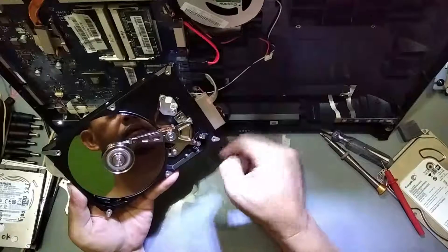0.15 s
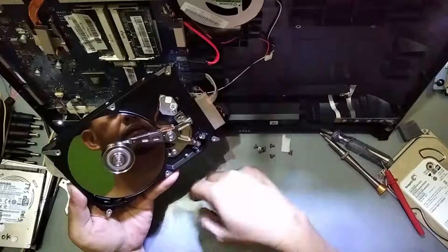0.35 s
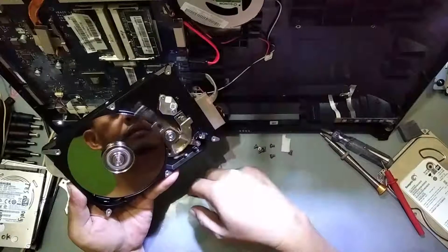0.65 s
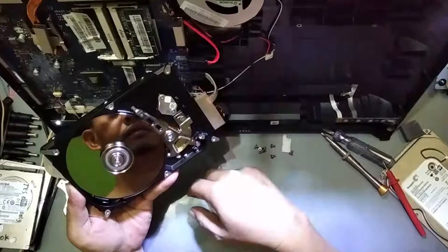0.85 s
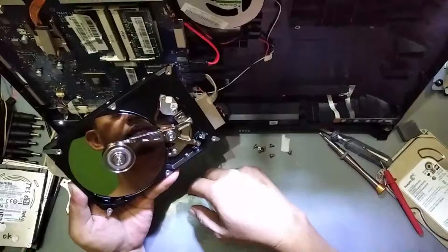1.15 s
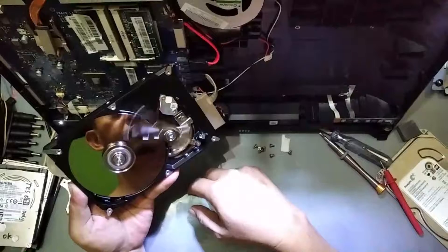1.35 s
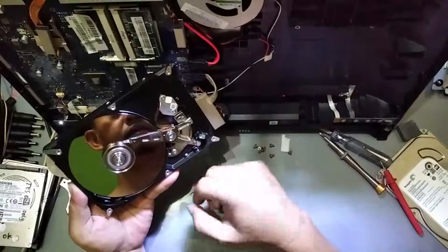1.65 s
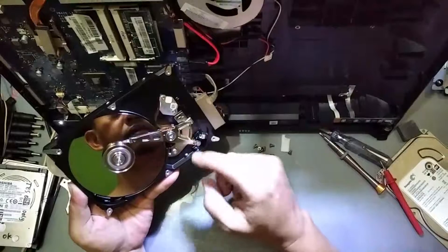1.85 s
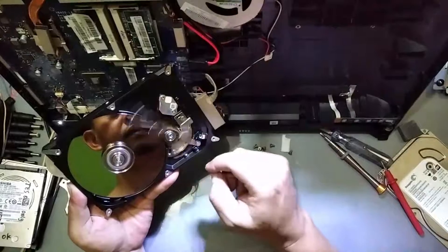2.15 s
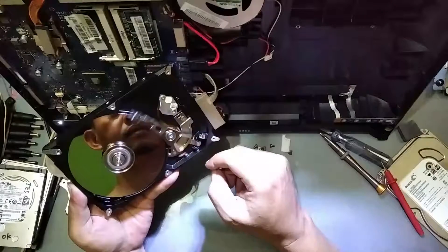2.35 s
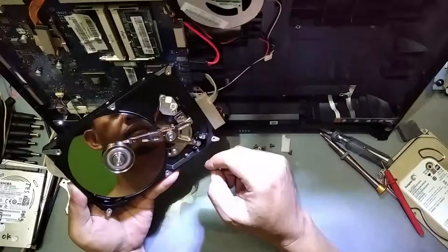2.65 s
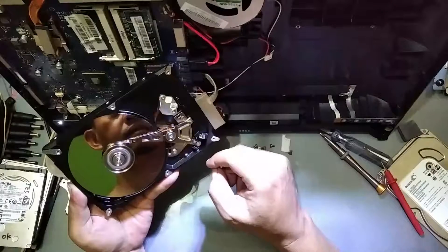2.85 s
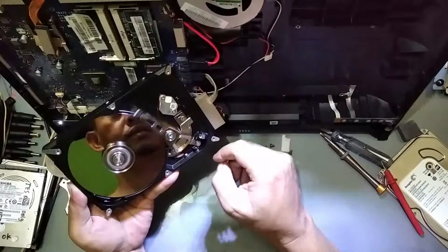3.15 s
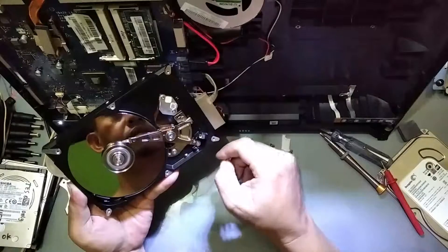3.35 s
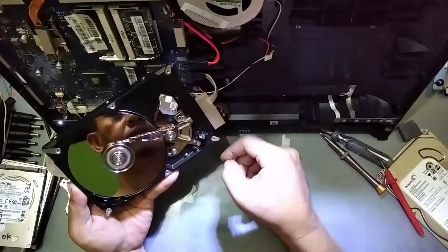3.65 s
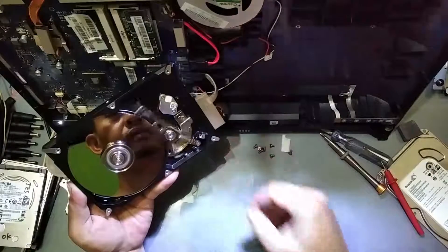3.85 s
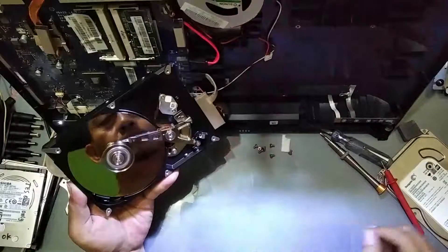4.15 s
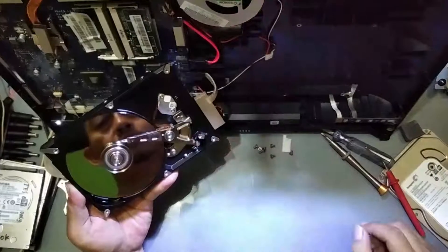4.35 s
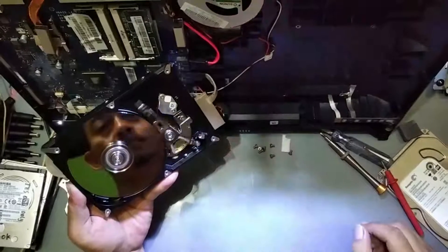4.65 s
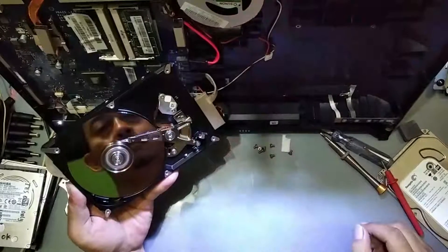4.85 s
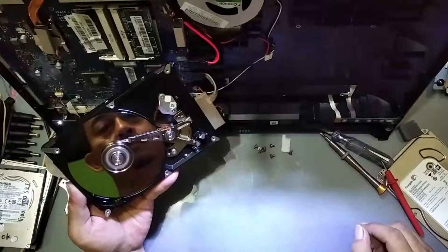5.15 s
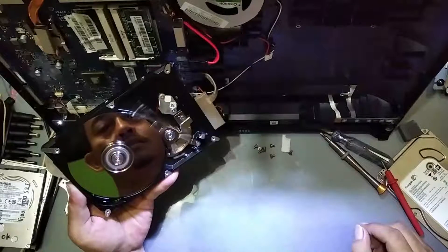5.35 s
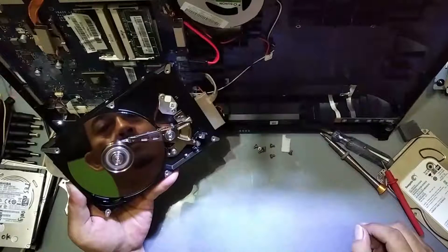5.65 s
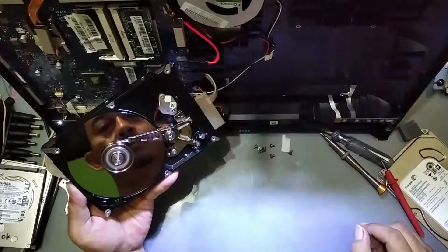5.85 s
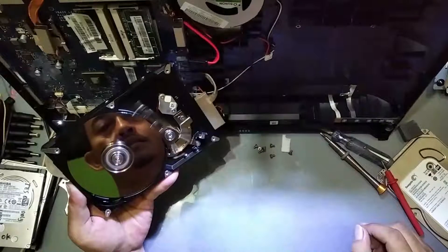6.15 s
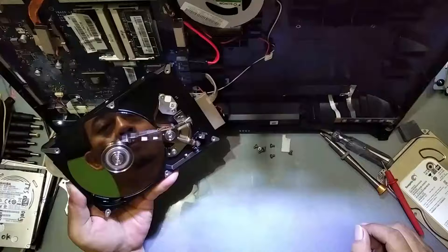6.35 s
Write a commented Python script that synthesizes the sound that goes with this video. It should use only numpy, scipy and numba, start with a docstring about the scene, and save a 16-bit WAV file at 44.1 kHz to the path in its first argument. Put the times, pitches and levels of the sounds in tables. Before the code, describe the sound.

Close to the microphone, an opened hard disk spins with a constant airy whine over faint computer fan noise and hum. About every 0.8 seconds its head arm slams with a sharp, bright metallic clack, usually followed by a rebound, a brief chirp and a lighter landing click with tiny bounces. Each hit rings in a small hard room. A hand softly bumps the desk near the start and again later.

```python
"""Opened hard disk on a desk

A small hard room, the camera's microphone close to an opened hard disk beside a running computer.
About every 0.8 s the head arm slams into its stop, mostly rebounds and chirps, then usually swings back and
bounces: damped arm modes, ringing chassis modes and decaying noise for the walls. Filtered noise gives the
air whine, the fan and two hand bumps; sines give the hum, and gain control ducks the loud slams."""
import sys
import numpy as np
from scipy import signal
from scipy.fft import rfft, irfft, next_fast_len
from scipy.io import wavfile
from scipy.ndimage import uniform_filter1d, minimum_filter1d, map_coordinates
from numba import njit

SR = 44100
rng = np.random.default_rng(int(sys.argv[2]) if len(sys.argv) > 2 else 0)


def transcribe(signal):
    """Save signal, clipped to [-1, 1], as a 16-bit WAV file at the path in sys.argv[1]."""
    frames = np.atleast_2d(signal).T
    limited = np.clip(frames, -1, 1)
    pcm = np.round(limited * 32767).astype(np.int16)
    wavfile.write(sys.argv[1], SR, pcm)


N = 286650  # length in samples

# The arm's retries. Each row: slam in seconds, slam level in dB, rebound level in dB (None if the arm only
# coasts), seconds from slam to landing (None if it does not land), landing level in dB, seconds between
# bounces. All levels are relative: head_arm() adds its own to them.
RETRIES = [(0.0056, 1, 8.5, 0.161, -3, 0.074), (0.765, 2.5, 7, None, None, None),
           (1.547, 3.5, None, 0.129, -2, 0.051), (2.3462, 2, 6.5, 0.1578, 2, 0.048),
           (3.1296, 2.5, 7.5, 0.16, 3.5, 0.053), (3.9113, 0.5, 5.5, 0.1643, -4.5, 0.075),
           (4.6945, 1.5, None, 0.131, -5, 0.066), (5.4932, 2.5, 10, 0.16, 3, 0.042),
           (6.2764, 2, 10.5, 0.1585, 3.5, 0.042)]
# Two light ticks where the arm does not land. Each row: start in seconds, relative level in dB,
# brightness in dB per octave.
LATE_TICKS = [(1.1395, -16, 5), (1.1679, -11, 0)]
# Heavily damped modes of arm and stop. Each row: pitch in Hz, relative level in dB, time to fall 60 dB in
# seconds, left minus right in dB.
ARM_MODES = [(1742.5, -23, 0.045, -12.5), (3060, -24, 0.049, 5), (4133, -12.5, 0.031, -8.5),
             (5366, -3.5, 0.011, -9.5), (5790, -8, 0.017, -14), (6538, -4.5, 0.016, -14.5),
             (6860, -20, 0.027, -5), (7850, -5, 0.0036, -17), (8926, -2, 0.012, 1), (9230, 0, .012, 4.5),
             (10530, -14, 0.0068, -11)]
# Long-ringing modes of platter and chassis. Each row: pitch in Hz, relative level in dB.
CHASSIS_MODES = [(1731, -8.5), (3098, -5), (4074, -6), (4231, -9), (5341, -3), (5410, -3), (5498, -5),
                 (5771, -25), (6452, -16), (6533, -18), (6672, -4), (8884, -11), (8949, -4.5), (9218, -3),
                 (10260, -11)]
# A short low splash at each slam, dead and quick. Each row: pitch in Hz, relative level in dB, time to fall 60
# dB in seconds.
SPLASH_MODES = [(174, -29, 0.018), (963, 2, 0.0049), (2170, 6, 0.0034)]
# Colour of the room's wash. Each row: frequency in Hz, relative density in dB per Hz.
WASH_SPECTRUM = [(1200, -31.5), (1730, -16.5), (2300, -21), (3400, -13.5), (4100, -2), (5000, -4.5),
                 (5400, 4), (6100, 0), (6550, 4.5), (7600, -8.5), (9000, 4), (9800, -8), (11600, -14),
                 (14000, -21)]
# Decay of the room. Each row: frequency in Hz, time to fall 60 dB in seconds.
ROOM_DECAY = [(1500, 0.38), (5000, 0.42), (9000, 0.35), (14000, 0.36)]
# The walls favour one side or the other. Each row: frequency in Hz, left minus right in dB.
WALL_LEAN = [(1700, -2.5), (3100, 2), (4200, 0), (6600, -3.5), (8000, -2), (9200, 7), (11000, 2.5)]
# Hand on the desk. Each row: start in seconds, thud level in dB, brush level in dB.
BUMPS = [(0.481, -37.5, -32), (3.855, -34, -38)]
# Colour of the desk under the hand. Each row: frequency in Hz, relative density in dB per Hz.
DESK_SPECTRUM = [(30, -30), (75, -8), (110, -4), (200, -4), (900, -2), (1300, -24), (4000, -28),
                 (14000, -60)]
# Resonances excited by the platter's air stream. Each row: centre in Hz, width in Hz, relative level in dB.
WINDAGE = [(1716, 167, 0.5), (2926, 340, -6.5), (3525, 317, 2.5), (4720, 800, -8.5), (5800, 770, -12.5),
           (8070, 1250, -5.5), (8970, 280, -2), (10400, 400, -18), (13200, 830, -28)]
# Air noise of the computer. Each row: frequency in Hz, relative density in dB per Hz.
FAN_SPECTRUM = [(25, -31), (60, -14), (110, 0), (170, -0.5), (270, -2.5), (400, -5), (600, -7),
                (1300, -9.5), (2500, -9.5), (5000, -50)]
# Lines of spindle and fan. Each row: pitch in Hz, relative level in dB.
HUM_LINES = [(119.8, -68), (209.5, -64), (261, -66), (313, -60), (365.6, -67.5), (479.2, -68.5)]
# Likeness of left and right in the steady noise. Each row: frequency in Hz, correlation from 0 to 1.
LIKENESS = [(60, 0.26), (150, 0.96), (380, 0.3), (950, 0.48), (2380, 0.43), (5980, 0.13), (15000, 0.067)]
# Stereo lean of the steady sound. Each row: frequency in Hz, left minus right in dB.
STEADY_LEAN = [(100, 13), (350, 14), (500, -0.5), (1200, 0.5), (1700, -2.5), (2400, 0.5), (3600, -1.5),
               (5500, 1.5), (7500, -2.5), (9200, 4.5), (11000, 3.5), (14000, 2.5)]
# Treble colour of the microphone. Each row: frequency in Hz, gain in dB.
MICROPHONE = [(10000, 0), (11600, 2), (12300, -2), (14000, 0.5)]

LEAD = 0.006  # the arm's last approach to the stop (s)
RISE = 0.0003  # time constant with which a contact builds up (s)
REBOUND_S = 0.0354  # from the slam to the second strike on the stop (s)
BOUNCES = 2  # small bounces after a landing
BOUNCE_DB, BOUNCE_LOSS_DB = -15.5, 10.5  # ceiling of a bounce; least loss from contact to contact (dB)
REBOUND_TILT, LANDING_TILT, BOUNCE_TILT = -2.7, -4.06, 0.5  # brightness (dB per octave)
CHIRP_S, CHIRP_DB = 0.146, -38.5  # chirp: delay after a driven slam (s), level (dB)
DESK_HZ, DESK_T60, DESK_DB = 108, 0.2, -0.5  # boom: pitch, decay (s), level against the thud (dB)
TOP_HZ = 14300  # nothing passes above this


def head_arm(slam_db, splash_db, tick_db):
    """The arm hits its stop hard with a short low splash; lighter contacts follow."""
    track = np.zeros((2, N))
    # the same walls and the same basic snap serve every contact
    walls = noise(WASH_SPECTRUM, SR // 2)
    snap = strike(crack_db=-9.5, crack_t60=0.013, spread=0.46)
    for s, db, *_ in RETRIES:
        slam = contact(walls, snap, snap_db=-17, metal_db=-35.5, room_db=-19.5)
        add(track, s - LEAD, swing(scrape_db=-21.0, push_db=-31.5, lead=LEAD))
        add(track, s, amp(db + slam_db) * slam)
        add(track, s, amp(db + splash_db) * splash(lean_db=17))
    for s, db, tilt_db in light_contacts():
        tick = contact(walls, snap, snap_db=-15.0, metal_db=-36, room_db=-19.5)

        def colour(hz):
            tilt = amp(tilt_db * np.log2((hz + 100) / 7000))
            # light contacts lack bass
            bass_cut = (hz ** 2 / (hz ** 2 + 1650 ** 2)) ** 2
            return tilt * bass_cut

        add(track, s, amp(db + tick_db) * filtered(tick, colour))
    return track


def light_contacts():
    """The arm rebounds, lands and bounces ever more weakly: (s, dB, brightness dB per octave)."""
    contacts = list(LATE_TICKS)
    for s, _, rebound_db, swing_s, db, flight_s in RETRIES:
        if rebound_db is not None:
            contacts.append((s + REBOUND_S, rebound_db, REBOUND_TILT))
        if swing_s is None:
            continue
        landing = s + swing_s
        contacts.append((landing, db, LANDING_TILT))
        for k in range(BOUNCES):
            db = min(db - BOUNCE_LOSS_DB, BOUNCE_DB)
            contacts.append((landing + (k + 1) * flight_s, db, BOUNCE_TILT))
    return [each for each in contacts if each[0] < N / SR]


def contact(walls, usual_snap, snap_db, metal_db, room_db):
    """A metal contact: much the same snap every time, the ring of the chassis and the wash of the room."""
    t = np.arange(walls.shape[1]) / SR
    # the echoes take a moment to gather
    wash = room(walls, fresh=0.24, lumpy_db=1.5) * (1 - 0.4 * np.exp(-t / 0.009))
    ring = amp(metal_db) * chassis(t, t60=0.45, vary_db=3.0)
    sound = filtered(ring + amp(room_db) * wash, lambda hz: pan(along(WALL_LEAN, hz)))
    own_snap = strike(crack_db=-1.5, crack_t60=0.017, spread=0.58)
    add(sound, 0, amp(snap_db) * unit(usual_snap + 0.32 * own_snap))
    return sound * (1 - np.exp(-t / RISE))


def strike(crack_db, crack_t60, spread):
    """The arm snaps: a crack of noise and damped modes, nearly in step at both ears (spread in radians)."""
    t = np.arange(SR // 20) / SR
    crack = noise([(600, -12), (2000, -1.0), (9500, 1.0), (14000, -3.5)], len(t))
    snap = amp(crack_db - 60 * t / crack_t60) * crack
    for hz, db, t60, lean_db in ARM_MODES:
        phase = rng.uniform(0, 2 * np.pi) + spread * rng.standard_normal((2, 1))
        mode = amp(db - 60 * t / t60) * np.sin(2 * np.pi * hz * t + phase)
        snap = snap + pan(lean_db) * mode
    return unit(snap)


def chassis(t, t60, vary_db):
    """Metal modes ring in close, beating pairs, struck at new strengths every time."""
    hz, db = np.transpose(CHASSIS_MODES + CHASSIS_MODES)
    hz = hz + rng.normal(0, 11.8, len(hz))
    strength = amp(db + vary_db * rng.standard_normal((2, len(hz))))
    weight = strength * np.exp(2j * np.pi * rng.random((2, len(hz))))
    ringing = (weight @ np.exp(2j * np.pi * np.outer(hz, t))).real
    return ringing * amp(-60 * t / t60)


def room(walls, fresh, lumpy_db):
    """The walls answer every blow nearly alike, in uneven echoes whose decay depends on frequency."""
    size = walls.shape[1]
    blow = unit(walls + fresh * noise(WASH_SPECTRUM, size))
    hz, age, z = signal.stft(blow, SR, nperseg=256)
    decay = amp(-60 * age / along(ROOM_DECAY, hz)[:, None])
    wash = signal.istft(z * decay, SR, nperseg=256)[1][:, :size]
    return wash * amp(lumpy_db * wobble(459.6, size))


def splash(lean_db):
    """A dead, very short low splash at each slam; neighbouring modes swing in opposite senses."""
    t = np.arange(SR // 20) / SR
    modes = 0
    for k, (hz, db, t60) in enumerate(SPLASH_MODES):
        modes = modes + (-1) ** k * amp(db - 60 * t / t60) * np.sin(2 * np.pi * hz * t)
    return pan(lean_db) * modes * (1 - np.exp(-t / RISE))


def swing(scrape_db, push_db, lead):
    """The arm scrapes along just before it hits the stop, and its recoil pushes the case."""
    u = np.linspace(0, 1, round(lead * SR))
    friction = noise([(1500, -29), (4500, 3.5), (6500, -4), (9000, 2.5), (12000, -17)], len(u))
    scrape = amp(scrape_db) * friction * u ** 0.017
    push = amp(push_db) * pan(13) * np.sin(np.pi * u ** 3)
    return scrape + push


def voice_coil(pitch_hz, length, echo_db, echo_t60):
    """The coil sings a short tone after each driven slam, which lingers blurred in the room."""
    track, t = np.zeros((2, N)), np.arange(SR // 4) / SR
    fade = np.clip(np.minimum(t, length - t) / 0.0024, 0, 1)
    tone = np.sqrt(2) * np.sin(2 * np.pi * pitch_hz * t) * fade
    driven = [s for s, _, rebound_db, *_ in RETRIES if rebound_db is not None]
    for s in driven:
        walls = rng.standard_normal((2, len(t))) * amp(-60 * t / echo_t60)
        walls = walls / np.linalg.norm(walls[0])
        echo = signal.fftconvolve(tone[None], walls, axes=1)[:, :len(t)]
        add(track, s + CHIRP_S, amp(CHIRP_DB) * (tone + amp(echo_db) * echo))
    return track


def hand(thud_t60, brush_t60):
    """Dull thuds of decaying noise make the desk top boom, with a brush of skin."""
    track, t = np.zeros((2, N)), np.arange(SR // 2) / SR
    boom = amp(DESK_DB - 60 * t / DESK_T60) * np.sin(2 * np.pi * DESK_HZ * t)
    for s, thud_db, brush_db in BUMPS:
        blow = amp(-60 * t / thud_t60) * noise(DESK_SPECTRUM, len(t))[0]
        thud = amp(thud_db) * pan(10) * (blow + boom)
        skin = noise([(500, -1.5), (4000, -0.5), (9000, -7), (14000, -21.0)], len(t))
        brush = amp(brush_db - 60 * t / brush_t60) * skin
        add(track, s, (thud + brush) * (1 - np.exp(-t / 0.00048)))
    return track


def spinning(whine_db, fan_db, hum_db, whine_waver_db, fan_waver_db, drift):
    """Air whines in the drive's resonances over fan noise and a hum with drifting phase (radians)."""
    t = np.arange(N) / SR

    def resonances(hz):
        power = 0
        for centre, width, db in WINDAGE:
            damping = (hz * width) ** 2
            power = power + amp(db) ** 2 * damping / ((centre * centre - hz * hz) ** 2 + damping)
        return np.sqrt(power)

    whine = amp(whine_db + whine_waver_db * wobble(8.6)) * rush(resonances)
    fan = amp(fan_db + fan_waver_db * wobble(3.88)) * rush(lambda hz: amp(along(FAN_SPECTRUM, hz)))
    hum = 0
    for hz, db in HUM_LINES:
        line = np.sin(2 * np.pi * hz * t + drift * wobble(5))
        hum = hum + amp(db + hum_db) * np.sqrt(2) * line
    return filtered(whine + fan + hum, lambda hz: pan(along(STEADY_LEAN, hz)))


def rush(response):
    """Steady stereo noise of rms 1, partly alike in the two channels."""
    def mid_side(hz):
        # the balance of mid and side sets the correlation of left and right
        turn = np.arccos(np.clip(along(LIKENESS, hz), -1, 1)) / 2
        return response(hz) * np.array([np.cos(turn), np.sin(turn)])

    mid, side = filtered(rng.standard_normal((2, N)), mid_side)
    return unit(np.array([mid + side, mid - side]))


def noise(spectrum, size):
    """Coloured noise of rms 1, unrelated in the two channels."""
    return unit(filtered(rng.standard_normal((2, size)), lambda hz: amp(along(spectrum, hz))))


def wobble(rate, size=N):
    """A smooth random curve, rate knots a second."""
    knots = rng.standard_normal(int(size * rate / SR) + 4)
    return map_coordinates(knots, [np.arange(size) * rate / SR])


def filtered(x, response):
    """x times a response of frequency, padded against wrap-around."""
    n = x.shape[-1]
    m = next_fast_len(n + 8192)
    return irfft(rfft(x, m) * response(np.fft.rfftfreq(m, 1 / SR)), m)[..., :n]


def pan(lean_db):
    """Left and right gains of constant power, for left minus right in dB."""
    pair = amp(np.array([[.5], [-.5]]) * lean_db)
    return pair / np.sqrt(np.mean(pair ** 2, axis=0))


def along(points, hz):
    """(Hz, value) points read on a log axis."""
    f, v = np.transpose(points)
    return np.interp(np.log(hz + 1), np.log(f + 1), v)


def amp(db):
    """Decibels to gain."""
    return 10 ** (np.asarray(db) / 20)


def unit(x):
    """x at rms 1."""
    return x / np.sqrt(np.mean(x ** 2) + 1e-20)


def add(track, s, sound):
    """Mix a sound into the track from time s on."""
    start = max(round(s * SR), 0)
    track[:, start:start + sound.shape[1]] += sound[:, :N - start]


def scene():
    """The drive on the desk: arm, chirps, hand and the steady spin."""
    arm = head_arm(slam_db=11, splash_db=-2, tick_db=-2.5)
    chirps = voice_coil(pitch_hz=2150, length=0.027, echo_db=-1.0, echo_t60=0.29)
    bumps = hand(thud_t60=0.17, brush_t60=0.3)
    steady = spinning(whine_db=-39.0, fan_db=-51.0, hum_db=-0.5,
                      whine_waver_db=0.5, fan_waver_db=2.5, drift=0.89)
    return arm + chirps + steady + bumps


@njit
def follow(need, attack, release):
    """Rise quickly toward the needed value and sink back slowly (time constants in samples)."""
    out, held = np.zeros(len(need)), 0.0
    for i in range(len(need)):
        held += (need[i] - held) / (1 + (attack if need[i] > held else release))
        out[i] = held
    return out


def gain_control(x, limit_db, attack, hold, release, slow_share, slow_release):
    """Loud peaks pull the gain down just ahead of time; part returns fast, part slowly (times in s)."""
    span = max(round(hold * SR), 1)
    # the loudest level within the hold time just past
    peak = -minimum_filter1d(-np.abs(x).max(axis=0), size=span, origin=(span - 1) // 2)
    over_db = np.maximum(20 * np.log10(peak + 1e-9) - limit_db, 0)
    share = np.clip(slow_share, 0, 1)
    fast_cut = follow(over_db, attack * SR, release * SR)
    slow_cut = follow(over_db, attack * SR, slow_release * SR)
    cut_db = (1 - share) * fast_cut + share * slow_cut
    # widening and smoothing the cut makes it begin a few samples early
    return x * amp(uniform_filter1d(minimum_filter1d(-cut_db, size=17), size=17))


def record(dry):
    """The camera: gain control, clipping of what slips through, microphone colour and band limit."""
    held = gain_control(dry, limit_db=2, attack=0.00006, hold=0.0048, release=0.033,
                        slow_share=0.4, slow_release=0.28)

    def colour(hz):
        notch_db = -5.9 * np.exp(-((hz - 4860) / 110) ** 2)
        return amp(along(MICROPHONE, hz) + notch_db) * (hz < TOP_HZ)

    return filtered(np.clip(held, -1, 1), colour)


dry = scene()
out = record(dry)
transcribe(out)
```